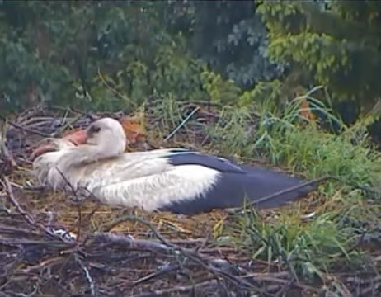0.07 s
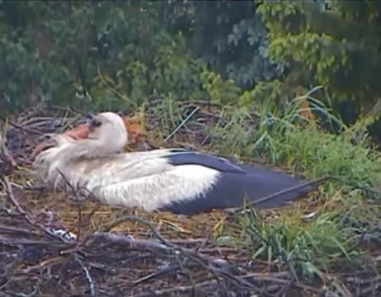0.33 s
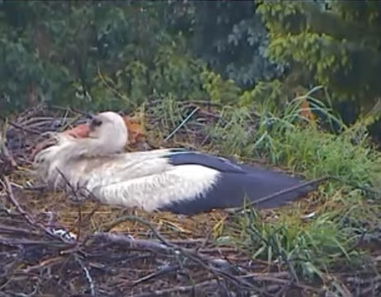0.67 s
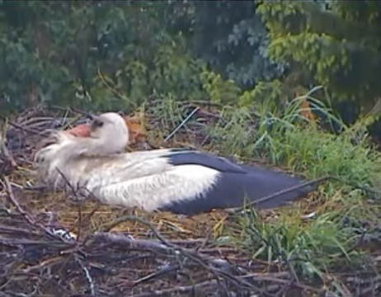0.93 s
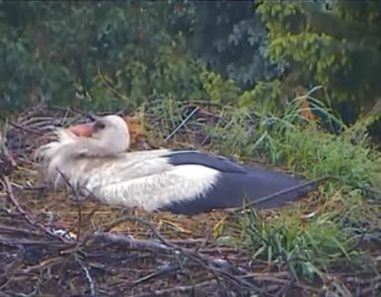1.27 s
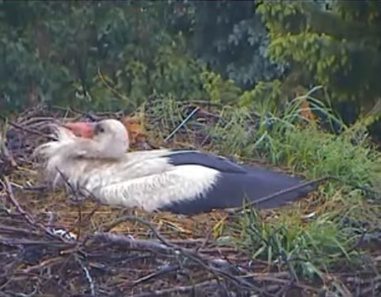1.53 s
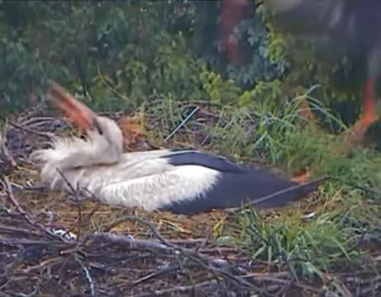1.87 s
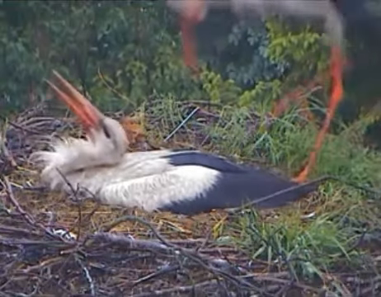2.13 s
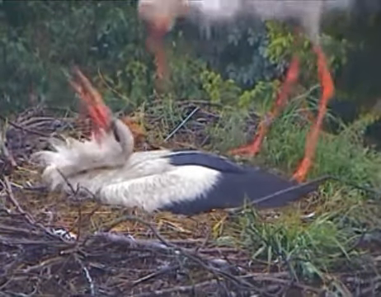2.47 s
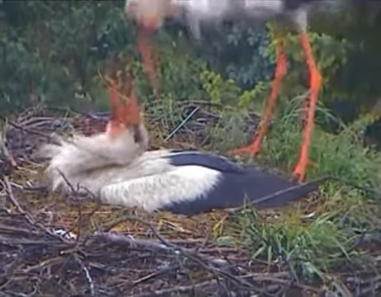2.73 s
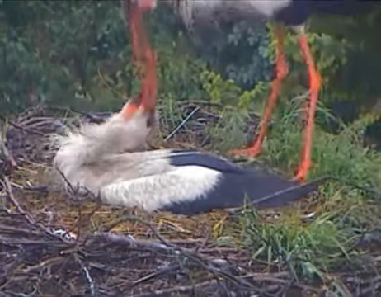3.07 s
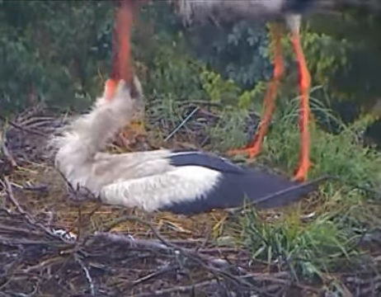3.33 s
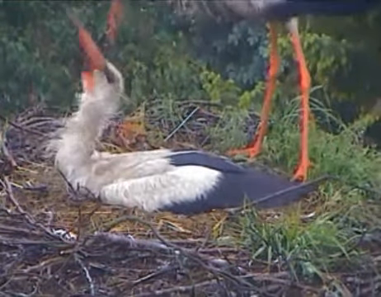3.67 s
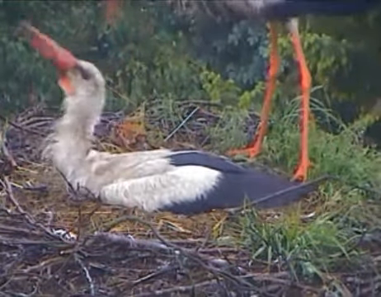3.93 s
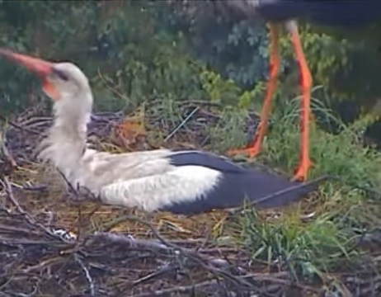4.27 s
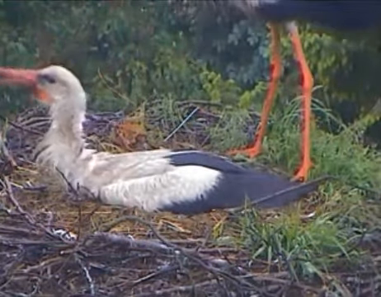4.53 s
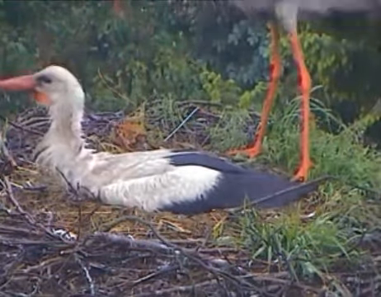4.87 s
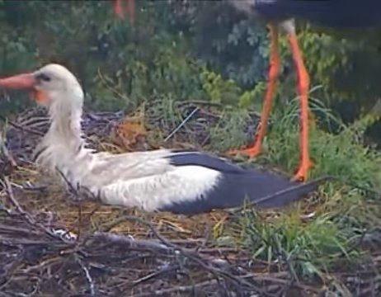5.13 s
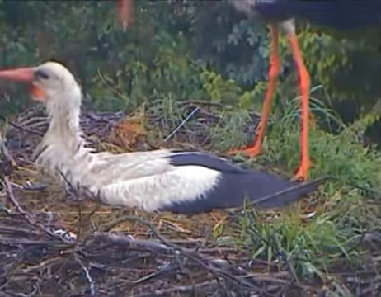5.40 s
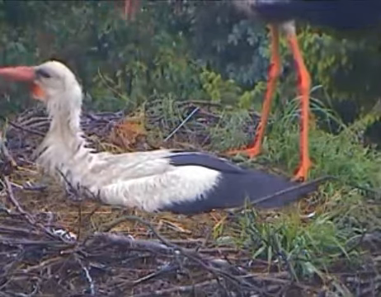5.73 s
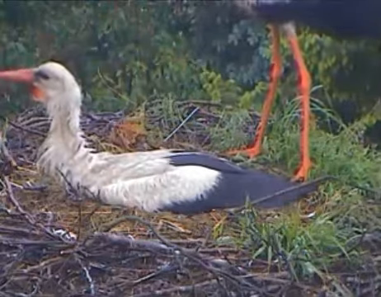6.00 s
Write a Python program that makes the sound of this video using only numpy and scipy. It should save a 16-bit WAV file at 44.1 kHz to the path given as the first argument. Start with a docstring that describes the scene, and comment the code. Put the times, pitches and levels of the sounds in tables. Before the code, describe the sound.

A soft, steady hiss of wind in leaves runs throughout, with thin, faint peeps from a small distant bird. At about 1.5 seconds a stork starts clattering its bill close by: dry, hollow, wooden clacks, evenly spaced at about eight a second, quickly rising to a moderate level. At 2.5 seconds a second stork joins, slightly faster, so the two rhythms overlap unevenly. It swells until about 3.8 seconds, becoming much louder than the first, with a hollow ring that gives way to a harder, brighter clack. The first bird stops near 4.8 seconds; the second keeps clattering loudly and regularly until the end, just after 6 seconds. Each clack leaves a very short outdoor echo, and the loudest are slightly squashed and clipped by the close microphone. Tiny, faint twig cracks come from the nest at about 0.3, 2.5 and 6.1 seconds.

```python
"""A nest among trees: two white storks greet by clattering their bills, about eight clacks a second.
The sitting bird starts; its standing mate joins, louder and slightly faster, and carries on alone.
In each clack the mandibles touch lightly, then slam shut and ring the bill and throat pouch.
Wind hisses in the leaves, nest twigs crack, a small bird peeps far off.
The close microphone ducks and clips on the loudest clacks."""
import sys
import numpy as np
from scipy import signal
from scipy.fft import rfft, irfft
from scipy.io import wavfile
from scipy.ndimage import uniform_filter1d, minimum_filter1d

SR = 44100
rng = np.random.default_rng(int(sys.argv[2]) if len(sys.argv) > 2 else 0)


def store_wav(level_fs):
    """Save 16-bit WAV to argv[1]."""
    pcm = np.round(np.clip(np.atleast_2d(level_fs), -1, 1) * 32767)
    wavfile.write(sys.argv[1], SR, pcm.T.astype(np.int16))


N = 272538

# wind spectrum: f/Hz, level/dB
WIND_SPECTRUM = [(30, -20), (100, -10), (175, -17.5), (290, -5), (400, -2.5), (900, -2), (1400, 0.5),
                 (3500, -2), (4400, -1), (5500, -4), (6700, -9), (7400, -16)]
# wind strength: t/s, level/dB
WIND_LEVEL = [(0, -40.9), (.6, -41.6), (1.2, -40.5), (2.4, -40), (3.5, -40.3), (4.8, -39.5), (6.18, -39.6)]
# twig cracks: t/s, level/dB, decay/s
TWIG_CRACKS = [(0.2562, -33, 0.0036), (2.513, -28, 0.0022), (6.099, -33, 0.0015)]
# crack spectrum: f/Hz, level/dB
CRACK_SPECTRUM = [(100, -30), (400, -8), (2000, 3), (7000, -3.0), (9000, -23)]
# small bird's notes: centre t/s, f/Hz, level/dB, length/s
BIRD_PEEPS = [(1.004, 4270, -41.5, 0.043), (1.373, 4920, -45, 0.036), (1.552, 4290, -42, 0.12),
              (2.11, 4200, -45.5, 0.11), (2.68, 4250, -39.5, 0.055), (4.785, 4200, -39.5, 0.099),
              (4.895, 4280, -44, 0.037), (5.58, 4200, -41, 0.085)]
# clacks of each stork: t/s, level/dB
SITTING_CLACKS = [(1.5034, 5.5), (1.6398, 12.5), (1.7734, 16), (1.9111, 21), (2.0465, 19.5), (2.1801, 16),
                  (2.3109, 17.5), (2.4399, 17), (2.5694, 19), (2.6994, 19), (2.8256, 19), (2.9523, 21.5),
                  (3.0764, 22.5), (3.2012, 22), (3.3265, 20), (3.4532, 21.5), (3.5814, 22), (3.7114, 20.5),
                  (3.8419, 20.5), (3.9732, 19.5), (4.1014, 18.5), (4.2314, 20.5), (4.4933, 26),
                  (4.626, 16.5), (4.7552, 7.5)]
STANDING_CLACKS = [(2.5351, 13), (2.6742, 15), (2.8076, 19), (2.9366, 20.5), (3.0619, 28), (3.1841, 27.5),
                   (3.3034, 29.5), (3.4248, 32), (3.5452, 33), (3.6632, 37.5), (3.7814, 39.5), (3.8988, 39),
                   (4.014, 37.5), (4.1305, 36.5), (4.2486, 36), (4.3647, 38), (4.4802, 36), (4.5939, 36.5),
                   (4.7088, 37), (4.8233, 38), (4.9401, 35.5), (5.0574, 38), (5.1757, 40), (5.293, 39.5),
                   (5.4098, 36.5), (5.5264, 36.5), (5.6447, 37), (5.7613, 36), (5.8777, 38), (5.9949, 36.5),
                   (6.1096, 36.5)]
# stroke, loose to brisk: t/s, touch re slam/dB, touch lead/ms, hardness/Hz, throat tuning/ratio
SITTING_STROKE = [(2.25, -5, 1.465, 1700, 0.954), (3.002, -17, 1.25, 4100, 1.01)]
STANDING_STROKE = [(2.9, 4, 1.602, 2680, 0.91), (3.42, -6, 1.5, 2710, 0.865),
                   (3.88, -14, 1.415, 2950, 0.93), (4.2, -11, 1.4, 4230, 1.023),
                   (5.1, -10.5, 1.412, 4730, 0.988)]
# bill and throat resonances: f/Hz, width/Hz, level/dB
SITTING_MODES = [(454, 144, -5.5), (620, 214, -5), (920, 120, -10), (1443, 540, -2), (1684, 260, 1),
                 (1970, 140, 2), (2184, 290, -1), (2920, 1050, -7), (3370, 85, -2), (4470, 98, -0.5)]
STANDING_MODES = [(610.6, 244, -8.5), (1517, 750, -6.5), (1622, 235, -0.5), (1880, 540, -8.5),
                  (2280, 210, -7.5), (2600, 310, -5), (3030, 334, -3), (3410, 1700, -14), (4240, 190, -13),
                  (4650, 276, -6), (5470, 180, -12), (6170, 510, -13), (6920, 160, -10.5)]
# stretched pouch resonances: f/Hz, width/Hz, level/dB
POUCH_MODES = [(2100, 380, 0), (5040, 160, -8)]
# pouch ring, fading as the head comes forward: t/s, level/dB
POUCH_LEVEL = [(2.5, -2), (3.1, 2), (3.6, -0.5), (4.0, -3), (4.4, -42)]
# tree echo spectrum: f/Hz, level/dB
ECHO_SPECTRUM = [(150, -30), (450, -9.5), (1000, -3), (1600, -6.5), (3000, 1), (3900, -2), (4700, 2.5),
                 (7000, -11.5), (9000, -42.5)]
# amplifier hiss spectrum: f/Hz, level/dB
HISS_SPECTRUM = [(100, -12.5), (8000, -9.5), (9500, -11), (11000, -25.5)]
# microphone output stage: f/Hz, gain/dB
OUTPUT_RESPONSE = [(25, -16.5), (80, -6), (200, -1.5), (350, -0.5), (7200, 1.5), (9000, -10.5),
                   (10500, -14.5), (12500, -23), (16000, -18)]


def undb(db):
    """Decibels to gain."""
    return 10 ** (np.asarray(db) / 20)


def unit(x):
    """Scale to rms 1."""
    return x / np.sqrt(np.mean(x ** 2))


def add(track, start, sound):
    """Mix a sound in from sample start."""
    part = sound[:max(len(track) - start, 0)]
    track[start:start + len(part)] += part


def colour(x, points):
    """Filter by (f/Hz, gain/dB) points."""
    hz, db = np.transpose(points)
    f = np.maximum(np.fft.rfftfreq(len(x), 1 / SR), 1)
    return irfft(rfft(x) * undb(np.interp(np.log(f), np.log(hz), db)), len(x))


def wander(rate_hz):
    """Random steps, smoothed twice; rms 1."""
    hold = int(SR / rate_hz)
    steps = np.repeat(rng.standard_normal(N // hold + 2), hold)
    return unit(uniform_filter1d(uniform_filter1d(steps, hold), hold)[:N])


def wind(flicker_db=1.47, flicker_hz=8.5, swell_db=0.15, swell_hz=2.14):
    """Far hiss of leaves: octave bands flicker separately and swell together."""
    hiss = rfft(unit(colour(rng.standard_normal(N), WIND_SPECTRUM + [(9000, -65.5)])))
    octave = np.log2(np.maximum(np.fft.rfftfreq(N, 1 / SR), 64)).astype(int)
    bands = (irfft(hiss * (octave == k), N) for k in np.unique(octave))
    leaves = sum(band * undb(flicker_db * wander(flicker_hz)) for band in bands)
    level_db = np.interp(np.arange(N) / SR, *np.transpose(WIND_LEVEL))
    return leaves * undb(level_db + swell_db * wander(swell_hz))


def twigs():
    """Dry sticks give way under the birds: brief broadband cracks."""
    out, t = np.zeros(N), np.arange(SR // 20) / SR
    for at_s, db, decay_s in TWIG_CRACKS:
        crack = unit(colour(rng.standard_normal(len(t)), CRACK_SPECTRUM))
        add(out, int(at_s * SR), undb(db) * crack * np.exp(-t / decay_s))
    return out


def peep(hz, length_s, waver=0.02, waver_hz=180):
    """One thin note, wavering on its way through the leaves."""
    n = int(length_s * SR)
    wobble = np.interp(np.arange(n) / SR * waver_hz, np.arange(64), rng.standard_normal(64))
    phase = 2 * np.pi * np.cumsum(hz * (1 + waver * wobble)) / SR
    return np.sqrt(2 * np.hanning(n)) * np.sin(phase)


def small_bird(twitter_hz=4400, span_hz=260, twitter_db=-52.5, note_s=0.08, notes=30):
    """A few distant peeps over a faint random twitter."""
    out = np.zeros(N)
    twitter = [(when * N / SR, twitter_hz + span_hz * (pitch - .5), twitter_db, note_s)
               for when, pitch in rng.random((notes, 2))]
    for centre_s, hz, db, length_s in list(BIRD_PEEPS) + twitter:
        start = max(int((centre_s - length_s / 2) * SR), 0)
        add(out, start, undb(db) * peep(hz, length_s))
    return out


def strokes(clacks, stroke):
    """Append to each clack the interpolated stroke settings, with random spread."""
    stroke_s, *settings = np.transpose(stroke)
    clack_s = np.transpose(clacks)[0]
    glide = np.transpose([np.interp(clack_s, stroke_s, values) for values in settings])
    spread = (3.4, 0.017, 180, 0.0083)  # touch/dB, lead/ms, hardness/Hz, tuning/ratio
    return np.hstack([clacks, glide + rng.standard_normal(glide.shape) * spread])


def resonator(f, modes):
    """Minimum-phase response of steep-skirted resonances."""
    power = sum(undb(2 * db) / (1 + ((f * f - hz * hz) / (f * width_hz)) ** 2) ** 2
                for hz, width_hz, db in modes)
    cepstrum = irfft(np.log(power + 1e-5))
    cepstrum[0] /= 2
    cepstrum[len(cepstrum) // 2:] = 0
    return np.exp(rfft(cepstrum))


def clatter(clacks, modes_at, rub_db, rub_tau_s=0.0018, throat_hz=(1200, 2160), size=2048):
    """Light touch, rub of the bill's edges and slam all ring the same damped resonances."""
    out = np.zeros(N)
    f = np.maximum(np.fft.rfftfreq(size, 1 / SR), 1)
    for at_s, db, touch_db, lead_ms, hardness_hz, tuning in clacks:
        start = int(at_s * SR) - size // 8
        t = (start + np.arange(size)) / SR - at_s
        slam = np.exp(-2j * np.pi * f * (at_s - start / SR))
        contact = 1 / (1 + 1j * f / hardness_hz)  # softer: longer push, less treble
        # the earlier, duller touch combs the spectrum
        touch = undb(touch_db) * contact * slam * np.exp(2j * np.pi * f * lead_ms / 1000)
        friction = rng.standard_normal(size) * np.exp(-np.abs(t) / rub_tau_s)
        rub = undb(rub_db) * rfft(friction / np.sqrt(np.sum(friction ** 2)))
        # bending the neck retunes the throat, not the rigid bill
        modes = [(hz * tuning if throat_hz[0] < hz < throat_hz[1] else hz, width_hz, mode_db)
                 for hz, width_hz, mode_db in modes_at(at_s)]
        force = (slam + touch + rub) * contact ** 2
        add(out, start, undb(db) * irfft(force * resonator(f, modes), size))
    return out


def sitting_stork():
    """The quieter clatter: bill and throat resonances."""
    return clatter(strokes(SITTING_CLACKS, SITTING_STROKE), lambda at_s: SITTING_MODES, rub_db=-15)


def nest_scatter(x, gain_db=-18, t60_s=0.06):
    """Nearby sticks throw back a short tail of each clack."""
    t = np.arange(SR // 10) / SR
    impulse = rng.standard_normal(len(t)) * np.exp(-np.log(1000) * t / t60_s)
    impulse /= np.sqrt(np.sum(impulse ** 2))
    return undb(gain_db) * signal.fftconvolve(x, impulse)[:N]


def tree_echo(x, gain_db=-24, t60_s=0.12, build_s=0.0031):
    """Moving leaves scatter each clack into a faint, pitchless tail."""
    t = np.arange(SR // 2) / SR
    tail = ((1 - np.exp(-t / build_s)) * np.exp(-np.log(1000) * t / t60_s)) ** 2
    power = np.maximum(signal.fftconvolve(x ** 2, tail / tail.sum())[:N], 0)
    return undb(gain_db) * np.sqrt(power) * unit(colour(rng.standard_normal(N), ECHO_SPECTRUM))


def standing_stork():
    """The louder clatter: the stretched pouch also rings while the head lies back."""
    def modes_at(at_s):
        stretch_db = np.interp(at_s, *np.transpose(POUCH_LEVEL))
        pouch = [(hz, width_hz, db + stretch_db) for hz, width_hz, db in POUCH_MODES]
        return list(STANDING_MODES) + pouch
    return clatter(strokes(STANDING_CLACKS, STANDING_STROKE), modes_at, rub_db=-13)


def limiter(x, threshold=0.54, ratio=1.84, hold_s=0.034, slew_s=0.0036, lag_s=0.0034):
    """Look-ahead gain control: everything ducks around each loud peak."""
    peak = -minimum_filter1d(-np.abs(x), int(hold_s * SR))
    gain = (threshold / np.maximum(peak, threshold)) ** (1 - 1 / ratio)
    slewed = uniform_filter1d(gain, int(slew_s * SR))
    return x * np.roll(slewed, int(lag_s * SR))


def scene():
    """Both storks, their reflections and the wood around them; mono."""
    bills = sitting_stork() + standing_stork()
    echoes = tree_echo(bills) + nest_scatter(bills)
    return (bills + echoes + twigs() + small_bird() + wind())[None]


def record(dry, silent_s=0.07, mic_top_hz=7300, clip_level=0.66, hiss_db=-67, output_top_hz=16400):
    """After a brief silence the sound begins; a narrow-band microphone's amplifier ducks, clips and hisses
    faintly."""
    sounding = np.arange(N) / SR > silent_s
    heard = signal.sosfilt(signal.butter(10, mic_top_hz, fs=SR, output="sos"), dry[0] * sounding)
    hiss = undb(hiss_db) * unit(colour(rng.standard_normal(N), HISS_SPECTRUM)) * sounding
    clipped = np.clip(limiter(heard), -clip_level, clip_level)
    rounded = colour(clipped + hiss, OUTPUT_RESPONSE)  # softer clip corners, thinner bass
    return signal.sosfilt(signal.ellip(8, .1, 70, output_top_hz, fs=SR, output="sos"), rounded)[None]


dry = scene()
out = record(dry)
store_wav(out)
```